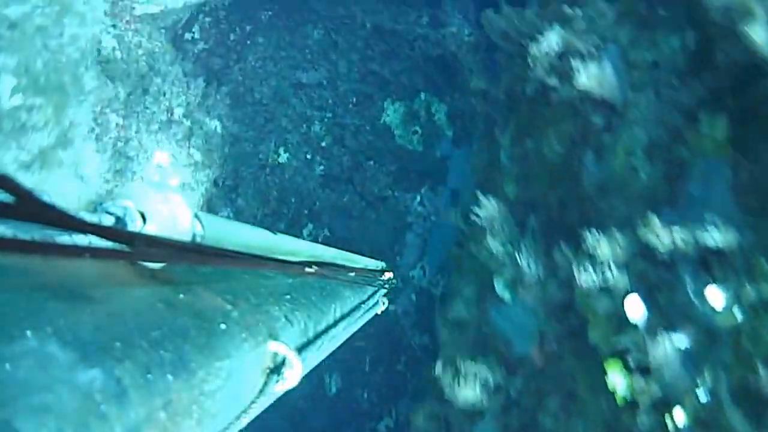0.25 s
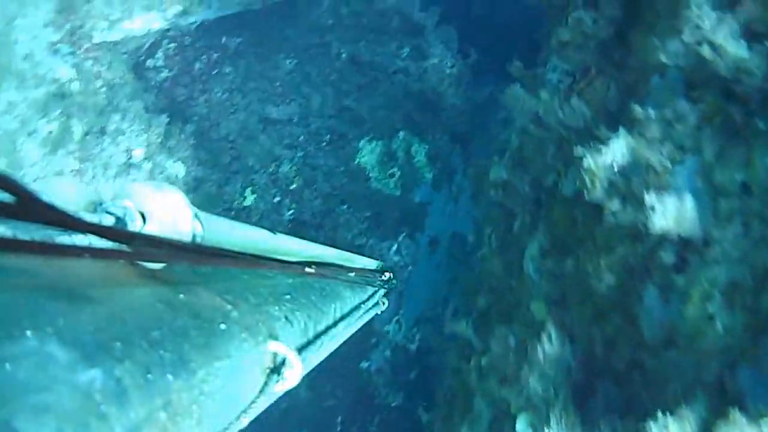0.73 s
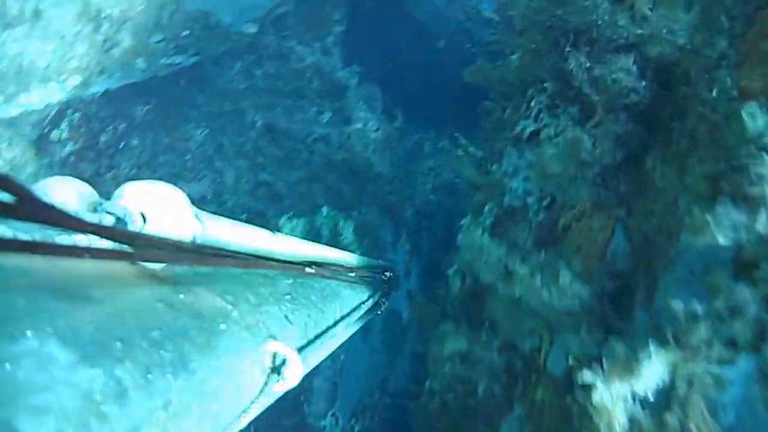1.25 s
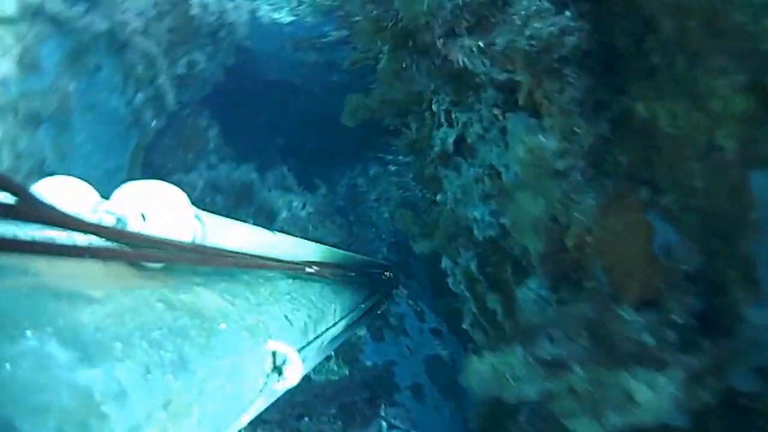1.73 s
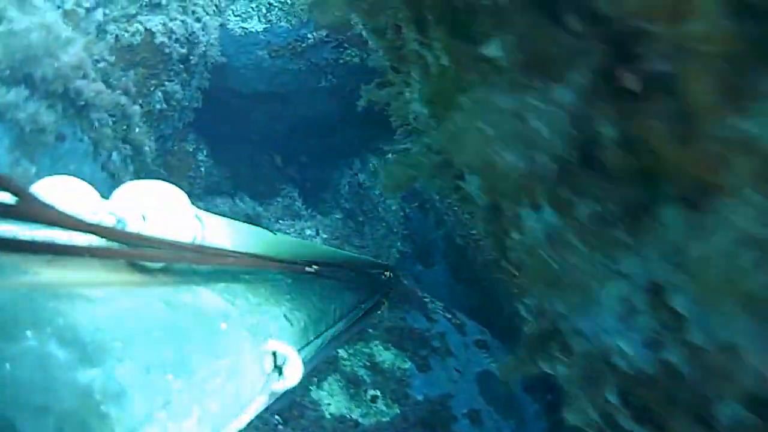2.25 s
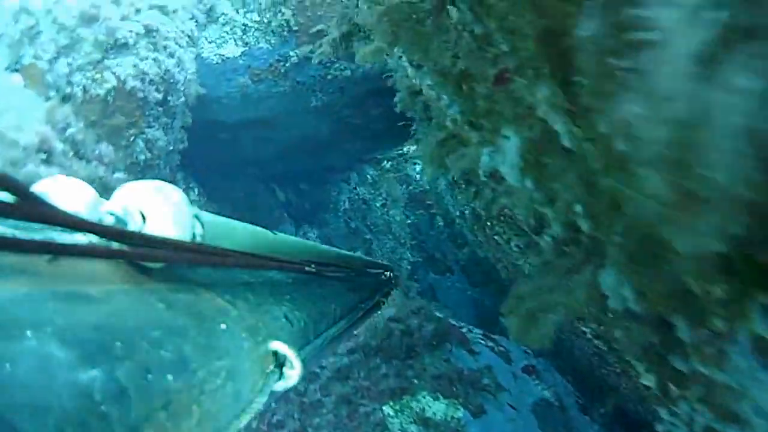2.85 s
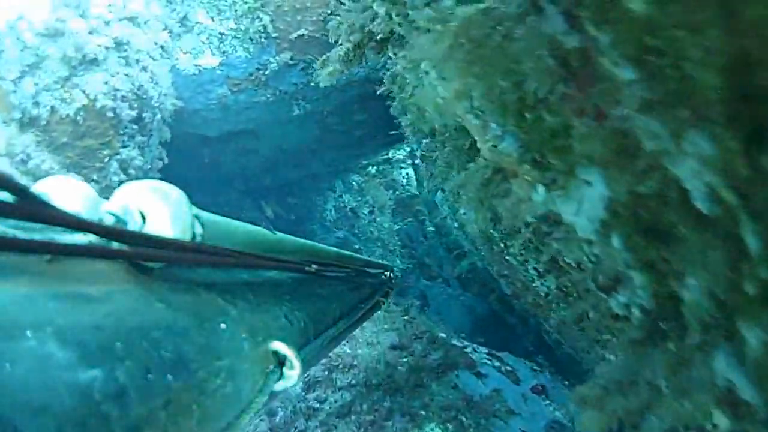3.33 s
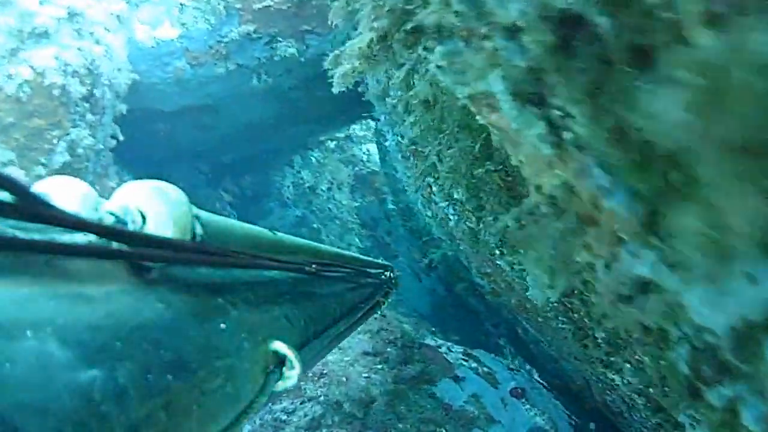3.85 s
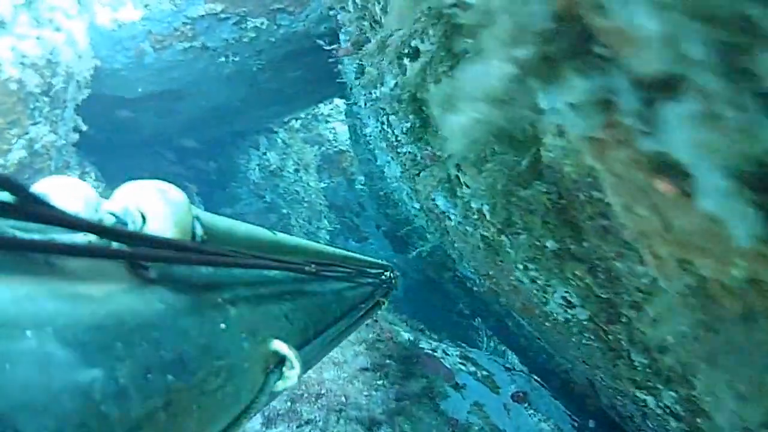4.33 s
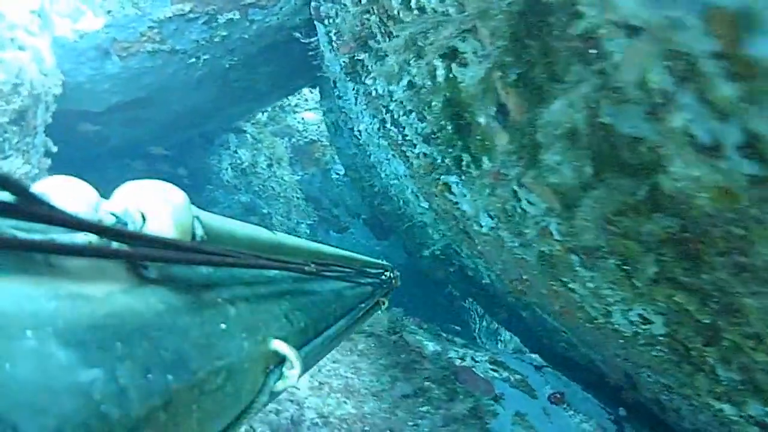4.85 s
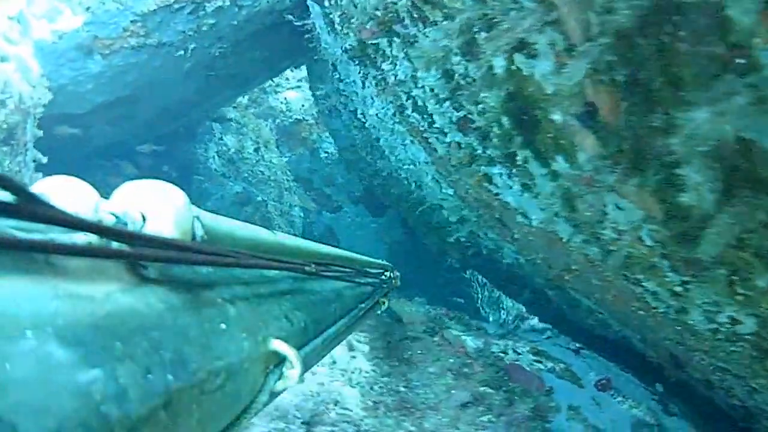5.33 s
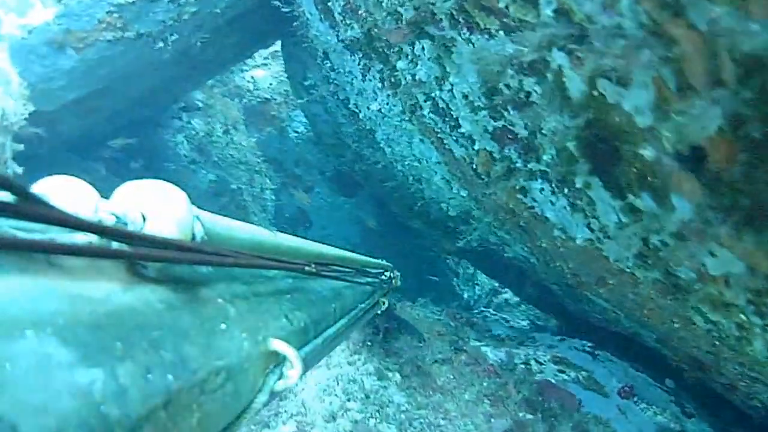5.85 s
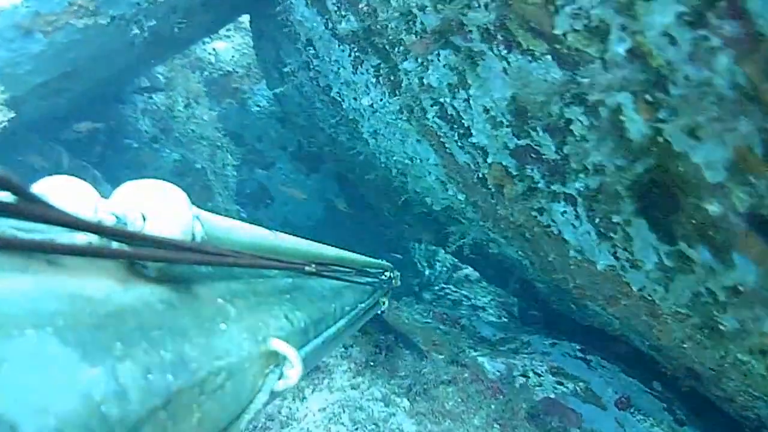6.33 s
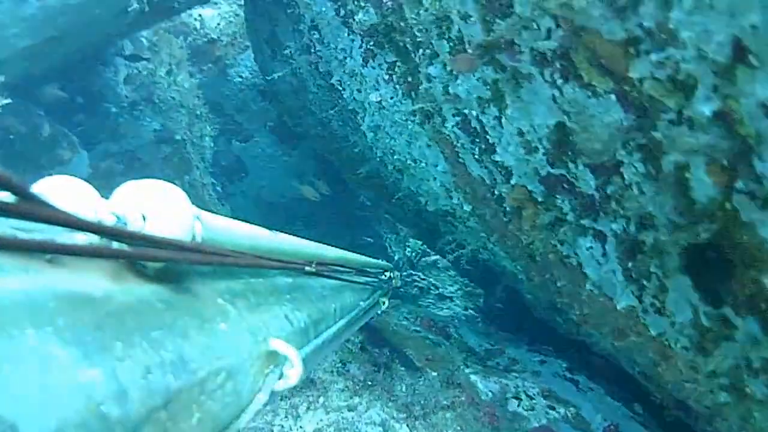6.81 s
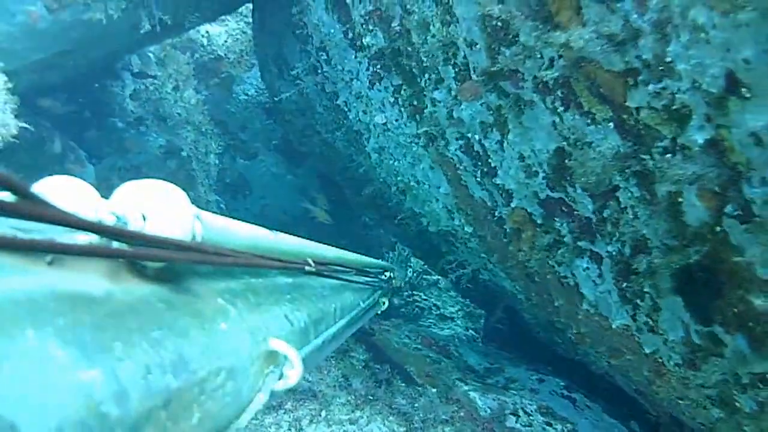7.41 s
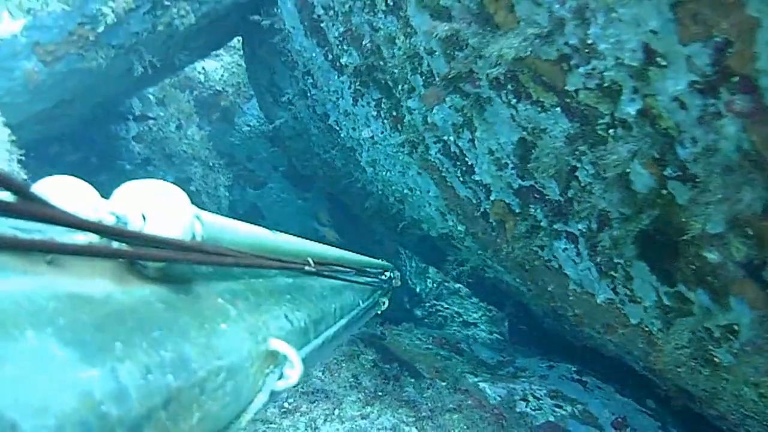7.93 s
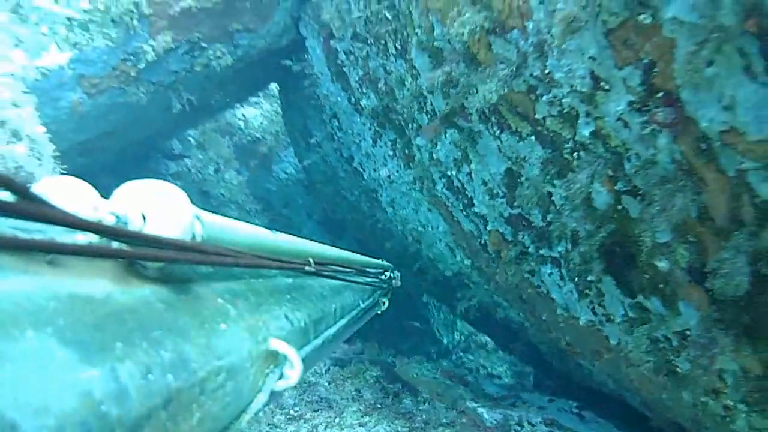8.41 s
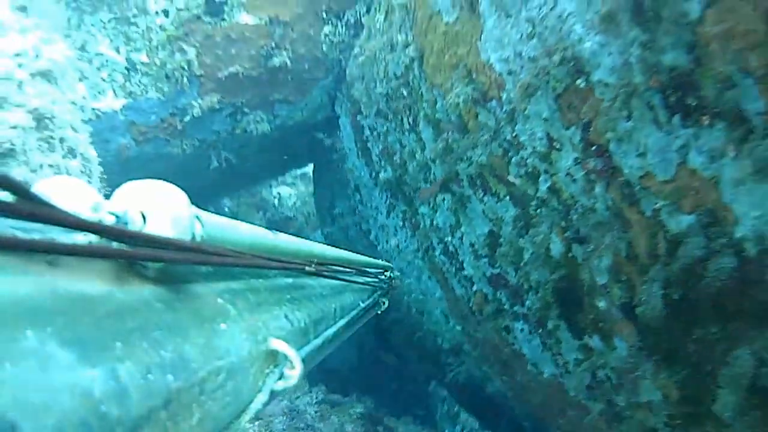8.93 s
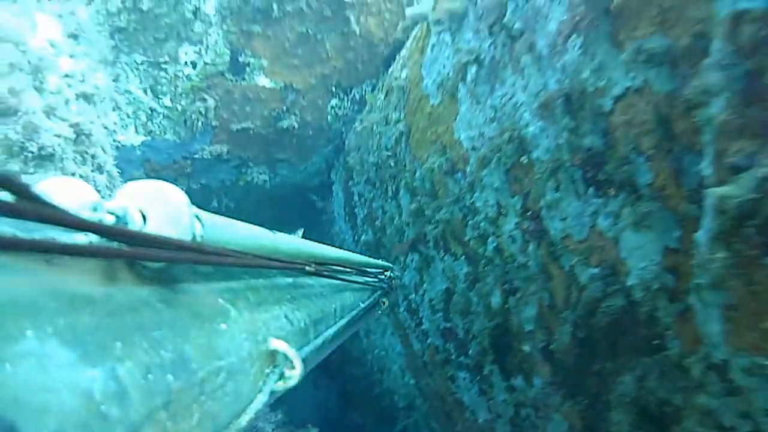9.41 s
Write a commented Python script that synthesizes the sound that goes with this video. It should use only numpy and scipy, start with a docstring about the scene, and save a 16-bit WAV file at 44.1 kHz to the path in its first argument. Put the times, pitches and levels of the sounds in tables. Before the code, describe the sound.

Water rumbles in surges against an underwater camera housing, with hollow knocks, small gurgles and faint snapping shrimp.

```python
"""A rocky reef, heard from a camera housing carried by a swimming diver.
Eddies rock the housing and rumble on it in surges that ease off. Gear knocks and rebounds on
its shell, which rings. Squeezed air pockets gurgle; shrimp snap all around, heard through the wall.
A third of the way in a faint electronic hiss and whine set in, with dry clicks and brief rustles."""
import sys
import numpy as np
from scipy import signal
from scipy.fft import rfft, irfft, next_fast_len
from scipy.io import wavfile
from scipy.ndimage import uniform_filter1d, map_coordinates

SR = 44100
rng = np.random.default_rng(int(sys.argv[2]) if len(sys.argv) > 2 else 0)


def to_wav(s):
    """Save 16-bit WAV."""
    ch = np.atleast_2d(s).T  # columns
    pcm = np.round(np.clip(ch, -1, 1) * 32767)  # PCM
    wavfile.write(sys.argv[1], SR, pcm.astype(np.int16))


N = 426447
TIME = np.arange(N) / SR


def from_db(db):
    """Decibels to gain."""
    return 10 ** (np.asarray(db) / 20)


def rms_one(x):
    """Scale to rms 1."""
    return x / np.sqrt(np.mean(x ** 2) + 1e-20)


def peak_one(x):
    """Scale to peak 1."""
    return x / (np.abs(x).max() + 1e-20)


def gain_curve(rows):
    """Gain through points of (time [s], level [dB])."""
    return from_db(np.interp(TIME, *np.transpose(rows)))


def add(track, start_s, sound):
    """Mix a sound into a track."""
    i = max(0, int(round(start_s * SR)))
    track[i:i + len(sound)] += sound[:max(0, N - i)]


def coloured(x, spectrum):
    """Apply a spectrum, falling 26 dB per octave beyond its ends."""
    hz, db = np.transpose(spectrum)
    size = next_fast_len(len(x))
    octave = np.log2(np.fft.rfftfreq(size, 1 / SR) + 1e-3)
    points = np.log2(hz)
    beyond = np.abs(octave - np.clip(octave, points[0], points[-1]))
    gain = from_db(np.interp(octave, points, db) - 26 * beyond)
    return irfft(rfft(x, size) * gain, size)[:len(x)]


def noise(spectrum):
    """Coloured noise of rms 1."""
    return rms_one(coloured(rng.standard_normal(N), spectrum))


def steady_noise(spectrum, span_s):
    """Coloured noise of rms 1, levelled over a sliding span."""
    x = noise(spectrum)
    envelope = np.abs(signal.hilbert(x, next_fast_len(N))[:N])
    power = uniform_filter1d(envelope ** 2, max(1, int(span_s * SR)))
    return rms_one(x / np.sqrt(power + 1e-6))


def resonance(x, hz, width_hz):
    """Two-pole resonator, peak gain 1."""
    r = np.exp(-np.pi * width_hz / SR)
    feedback = [1, -2 * r * np.cos(2 * np.pi * hz / SR), r * r]
    return signal.lfilter(np.array([1, 0, -1]) * (1 - r * r) / 2, feedback, x + 1e-18)


def ringing(x, modes):
    """Parallel resonators."""
    return sum(from_db(db) * resonance(x, hz, width_hz) for hz, width_hz, db in modes)


def band(x, low_hz, high_hz, order=2):
    """Butterworth band-pass."""
    sos = signal.butter(order, [low_hz, high_hz], "band", fs=SR, output="sos")
    return signal.sosfilt(sos, x + 1e-18)


def grains(per_s, spread_db):
    """Random impulses, a few much stronger than the rest."""
    sizes = from_db(spread_db * np.minimum(rng.exponential(1, N), 4)) * rng.choice([-1, 1], N)
    return sizes * (rng.random(N) < per_s / SR)


# (frequency [Hz], relative density [dB])
HISS_SPECTRUM = [(300, -40), (2000, 1), (4500, 11), (6500, 8.5), (9000, 7.5), (12500, 5.5), (15500, 0)]
# (frequency [Hz], rms [dB])
WHINE_TONES = [(3900, -73), (15000, -77)]
def electronics(hiss_db=-68):
    """Thin electronic hiss and a steady whine."""
    whine = sum(from_db(db) * np.sqrt(2) * np.sin(2 * np.pi * hz * TIME) for hz, db in WHINE_TONES)
    return whine + from_db(hiss_db) * noise(HISS_SPECTRUM)


# (frequency [Hz], gain [dB])
RUB_SPECTRUM = [(500, 3), (2000, -10), (4000, -8), (8300, -9), (9800, -14), (14000, -10), (16000, -22)]
# (frequency [Hz], width [Hz], gain [dB])
RUB_MODES = [(4040, 250, 3), (4930, 220, 4), (6170, 680, -1), (6500, 270, -5), (8450, 350, 0)]
# (crest time [s], rms [dB], rise [s], fall [s])
RUB_SWELLS = [(3.89, -60, 0.031, 0.068), (4.69, -67, 0.022, 0.06), (4.82, -65.5, 0.05, 0.21),
              (7.174, -44.5, 0.001, 0.049), (7.33, -45, 0.019, 0.015), (7.413, -58.5, 0.008, 0.026),
              (7.82, -58, 0.063, 0.033), (8.365, -58, 0.015, 0.015), (8.7, -61, 0.012, 0.012)]
def rustle(ring_db=-2):
    """Dry, grainy rubs swell and die away, exciting sharp resonances."""
    rubbing = coloured(grains(per_s=2800, spread_db=3.2), RUB_SPECTRUM)
    ring = from_db(ring_db) * rms_one(ringing(rubbing, RUB_MODES))
    pressure = sum(from_db(db) * np.exp(-np.maximum((at_s - TIME) / rise_s, (TIME - at_s) / fall_s))
                   for at_s, db, rise_s, fall_s in RUB_SWELLS)
    return pressure * rms_one(rms_one(rubbing) + ring)


# (time [s], peak [dB], tick centre [Hz], edge re tick [dB], body re tick [dB])
DRY_CLICKS = [(3.893, -31.5, 5800, -22, -25), (3.899, -30.5, 7000, 10, -25), (3.943, -37, 9900, 9, -25),
              (4.6585, -25.5, 5130, -28, -5), (4.8394, -38, 6600, 0, -25), (7.171, -23, 6700, -4, -8),
              (7.189, -34, 7000, -20, -20), (7.331, -44, 3000, -25, -16), (7.3368, -24.5, 6200, -15, 2),
              (8.057, -46, 5200, -18, -15)]
def dry_clicks(decay_s=0.0012, width_hz=2400):
    """Crisp noise bursts: a pitched tick, a shorter bright edge, a dull body."""
    out, t = np.zeros(N), TIME[:SR // 40]
    decay = np.exp(-t / decay_s)
    for at_s, db, hz, edge_db, body_db in DRY_CLICKS:
        burst = rng.standard_normal(len(t)) * decay
        tick = peak_one(resonance(resonance(burst, hz, width_hz), hz, width_hz))
        edge = from_db(edge_db) * peak_one(band(burst * decay, 9100, 17400))
        body = from_db(body_db) * peak_one(band(burst, 330, 2300))
        add(out, at_s, from_db(db) * peak_one(tick + edge + body))
    return out


# (time [s], relative level [dB])
SEA_FADE = [(0, -50.5), (5.9, -52.5), (9.67, -56)]
# (frequency [Hz], relative density [dB])
SEA_SPECTRUM = [(150, -10.5), (330, 4), (410, 4.5), (490, 7), (590, 0.5), (800, -0.5), (1400, -4.5),
                (1800, -3), (2200, -6.5), (3200, -10.5), (3650, -8.5), (4100, -34)]
def open_water(gain_db=4.5, diffuse_db=-15):
    """Slowly fading sea noise: its gain curve, a mono murmur and a diffuse stereo part."""
    gain = gain_curve(SEA_FADE) * from_db(gain_db)
    diffuse = from_db(diffuse_db) * rms_one(band(rng.standard_normal((2, N)), 860, 3475, order=8))
    return gain, gain * noise(SEA_SPECTRUM), gain * diffuse


# (frequency [Hz], width [Hz], gain [dB])
WALL_MODES = [(1790, 130, 1.5), (1290, 900, -32.5), (2790, 560, -4.5)]
def housing_wall(snaps, top_mode_db):
    """The wall rings with each snap and blocks the high treble."""
    *lower_modes, (hz, width_hz, db) = WALL_MODES
    modes = lower_modes + [(hz, width_hz, db + top_mode_db)]
    return band(ringing(snaps, modes), 910, 4050, order=6)


# (time [s], relative peak [dB], relative top mode gain [dB])
NEAR_SNAPS = [(0.616, -39, -6), (0.799, -36.5, -7), (1.506, -37, -10), (1.9142, -31.5, -11),
              (0.4787, -37.5, -24), (2.143, -37, -9), (2.3131, -33.5, -41), (2.6896, -37.5, -8),
              (2.989, -38.5, -25), (3.109, -39.5, -19), (4.0412, -37.5, -30), (4.384, -38.5, -9),
              (4.644, -36.5, -24), (5.2462, -33.5, -8.5), (5.549, -39.5, -31), (6.497, -41, 3),
              (7.0477, -38, -20), (7.8646, -37, -13), (7.8768, -33, -10), (8.399, -39, -12),
              (9.2797, -37.5, -11)]
def shrimp(sea_gain, near_db=7.0, far_db=-9.0, smear_s=0.0037):
    """Near snaps, smeared by the rocks, over the crackle of the whole reef."""
    near, t = np.zeros(N), TIME[:SR // 25]
    for at_s, db, top_mode_db in NEAR_SNAPS:
        snap = rng.standard_normal(len(t)) * np.exp(-t / smear_s)
        add(near, at_s - .001, from_db(db + near_db) * peak_one(housing_wall(snap, top_mode_db + 6.0)))
    far_snaps = grains(per_s=200, spread_db=3.6)
    smeared = signal.lfilter([1], [1, -np.exp(-1 / (smear_s * SR))], far_snaps + 1e-18)
    crackle = rms_one(housing_wall(smeared * rng.standard_normal(N), top_mode_db=-2.6))
    return near + sea_gain * from_db(far_db) * crackle


# (time [s], rms [dB])
BURBLE_LEVEL = [(0, -48), (3.5, -53.5), (8.3, -53), (9.0, -67)]
def burble():
    """Small air pockets ring at random."""
    pockets = resonance(grains(per_s=110, spread_db=1.6), hz=475, width_hz=45)
    return gain_curve(BURBLE_LEVEL) * rms_one(band(pockets, 250, 650))


# (time [s], peak [dB], pitch [Hz], squeeze length [s])
AIR_POCKETS = [(0.233, -26, 484, 0.014), (0.498, -20.5, 488, 0.061), (0.942, -27, 484, 0.012),
               (2.104, -26.5, 489, 0.013), (2.357, -21, 481, 0.015), (3.267, -26, 488, 0.041),
               (3.351, -31.5, 496, 0.04), (3.871, -33, 470, 0.023), (3.961, -28, 412, 0.029),
               (4.421, -36, 492, 0.014), (5.277, -29.5, 383, 0.014), (5.547, -31, 483, 0.0047),
               (5.635, -32.5, 465, 0.025), (5.7, -37, 488, 0.015), (5.965, -35.5, 486, 0.032),
               (6.347, -27, 364, 0.019), (6.355, -30.5, 522, 0.029), (6.411, -25.5, 471, 0.037),
               (6.779, -26, 472, 0.01), (7.368, -26, 492, 0.013), (7.564, -32.5, 499, 0.038),
               (7.685, -33.5, 450, 0.02), (7.983, -32, 460, 0.0058), (8.262, -27, 502, 0.023),
               (8.345, -30, 507, 0.03), (9.278, -36, 456, 0.011)]
def gurgles(decay_s=0.013, flutter_share=0.4, rise_share=0.09):
    """Larger air pockets pulsate while squeezed, rising slightly in pitch."""
    out, t = np.zeros(N), TIME[:SR // 8]
    for at_s, db, hz, length_s in AIR_POCKETS:
        envelope = (1 - np.exp(-t / 0.00018)) * np.exp(-np.maximum(t - 0.55 * length_s, 0) / decay_s)
        pitch_hz = hz * (1 + rise_share * (np.minimum(t / length_s, 1) - .5))
        tone = np.sin(2 * np.pi * np.cumsum(pitch_hz) / SR)
        flutter = flutter_share * rms_one(band(rng.standard_normal(len(t)), 390, 535))
        add(out, at_s, from_db(db) * peak_one(envelope * (tone + flutter)))
    return out


# water speed past the housing (time [s], relative level [dB])
FLOW_SPEED = [(0, -20), (0.27, -23), (0.37, -13.5), (0.7, -19), (1.08, -13), (1.8, -17.5), (2.85, -19),
              (3.5, -21.5), (3.7, -30), (3.94, -17), (4.1, -23.5), (5.6, -26.5), (6.0, -24.5), (6.8, -29.5),
              (7.35, -26), (7.7, -30.5), (9.3, -32), (9.67, -24)]
# (time [s], sway boost [dB], swish rms [dB])
DIVER_SURGES = [(0.57, 7, -33.5), (1.58, 10, -39.5), (2.15, 10.5, -40.5), (2.7, 8, -49.5), (3.6, 6, -55.5),
                (4.25, 8, -63), (6.35, 6, -54.5), (7.25, 3.5, -48.5)]
# each (frequency [Hz], relative density [dB])
SWAY_SPECTRUM = [(6, -13), (10, 1), (14, -2), (20, -12.5), (32, -26.5), (42, -29)]
BOOM_SPECTRUM = [(26, -19.5), (35, -12), (43, 3.5), (48, -1.5), (56, 5.5), (62, -8), (72, -15.5),
                 (110, -37.5)]
WASH_SPECTRUM = [(50, -10.5), (75, -3.5), (100, 0), (135, -5.5), (185, -9), (240, -9), (330, -18),
                 (480, -26), (900, -40)]
SWISH_SPECTRUM = [(150, -6), (240, 3.5), (310, -4), (430, -22)]
def flow(usual_speed_db=-23, sway_db=-20.5, boom_db=-24.75, wash_db=-42.5, surge_sigma_s=0.15):
    """Eddies sway, boom and wash on the housing, growing with speed; surges add sway and swish."""
    speed = gain_curve(FLOW_SPEED) / from_db(usual_speed_db)
    at_s, boost_db, swish_db = np.transpose(DIVER_SURGES)
    surges = np.exp(-.5 * ((TIME - at_s[:, None]) / surge_sigma_s) ** 2)
    sway_gain = from_db(sway_db + boost_db @ surges) * speed ** 0.52
    sway = sway_gain * steady_noise(SWAY_SPECTRUM, span_s=0.17)
    boom = from_db(boom_db) * speed * steady_noise(BOOM_SPECTRUM, span_s=0.2)
    wash = from_db(wash_db) * speed ** 0.63 * steady_noise(WASH_SPECTRUM, span_s=0.03)
    swish = from_db(swish_db) @ surges * noise(SWISH_SPECTRUM)
    return sway + boom + wash + swish


# (frequency [Hz], relative level [dB], t60 [s])
HOUSING_MODES = [(128.7, -19, 0.26), (160, -14.5, 0.16), (218, -18.5, 0.28), (246.5, -8.5, 0.17),
                 (333.7, -10, 0.12), (433.4, -12.5, 0.1), (487, -13.5, 0.1), (635, -37, 0.046),
                 (773, -33, 0.044), (836, -38, 0.069)]
# (frequency [Hz], width [Hz], gain [dB])
CRACK_MODES = [(667, 71, -4), (807, 130, -3.5), (840, 230, -3.5), (1242, 38, -3.5), (1477, 51, -2)]
# successive touches of one knock (strength [ratio])
TOUCHES = [0.75, 0.62, 0.39, 0.062]
# (time [s], body peak [dB], rebound gap [s], contact sigma [s], ring gain [dB], crack re body [dB])
GEAR_KNOCKS = [(0.3418, -4, 0.0061, 0.00069, -4, -28), (1.083, -12, 0.008, .001, -9, -23),
               (1.091, -20.5, 0.0037, 0.00053, -31, -3.5), (1.2, -3.5, 0.0082, .0012, -15, -17),
               (1.2041, -8, 0.00385, 0.00072, -14.5, -15), (1.705, -20, 0.0038, 0.00067, -21, -29),
               (1.94, -16, 0.0059, 0.00065, -10, -32.5), (1.967, -12.5, 0.0066, 0.00096, -4.5, -22),
               (2.126, -12, 0.0036, 0.0008, -8, -21), (2.4676, 7, 0.0043, 0.00045, 2.5, -16.5),
               (3.961, -30, 0.0064, 0.0013, 7, -13), (4.076, -28, 0.0045, 0.00043, -5, -24),
               (5.394, -28, 0.0059, 0.0004, -19, -19), (7.332, -27.5, 0.0103, 0.0016, -5, -18),
               (7.818, -31.5, 0.0071, 0.00084, -5, -25), (8.986, -48, 0.0025, 0.00019, -14, 13),
               (9.481, -20, 0.0069, 0.001, -11, -27)]
def knocks(crack_s=0.0015, ring_attack_s=0.00087, yield_share=0.46):
    """Gear hits and rebounds; the housing yields to the slow part of each push and rings on."""
    out, t = np.zeros(N), TIME[:SR // 3] - .003
    age_s = np.maximum(t, 0)
    ring = sum(from_db(db - 60 * age_s / t60_s) * np.sin(2 * np.pi * hz * age_s)
               for hz, db, t60_s in HOUSING_MODES)
    ring *= 1 - np.exp(-age_s / ring_attack_s)
    for at_s, db, gap_s, contact_s, ring_db, crack_db in GEAR_KNOCKS:
        pushes = sum(strength * np.exp(-.5 * ((t - k * gap_s) / contact_s) ** 2)
                     for k, strength in enumerate(TOUCHES))
        thud = peak_one(band(pushes, yield_share / gap_s, 3000))
        body = peak_one(thud + from_db(ring_db) * ring)
        grit = rng.standard_normal(len(t)) * np.exp(-age_s / crack_s) * (t > 0)
        crack = peak_one(band(ringing(grit, CRACK_MODES), 610, 2200, order=4))
        add(out, at_s, from_db(db) * (body + from_db(crack_db) * crack))
    return out


def scene(right_lead_s=0.00013, hiss_start_s=3.385, floor_db=-83):
    """Water sounds reach the right port first; clicks, rustle and electronics sit in the middle."""
    sea_gain, murmur, diffuse = open_water()
    right = murmur + shrimp(sea_gain) + burble() + gurgles() + flow() + knocks()
    left = map_coordinates(right, [np.arange(N) - right_lead_s * SR], order=3, mode="nearest")
    middle = (electronics() + rustle()) * (TIME > hiss_start_s) + dry_clicks()
    self_noise = from_db(floor_db) * rng.standard_normal((2, N))
    return np.array([left, right]) + diffuse + middle + self_noise


# left and right input (DC bias [share of full scale])
INPUT_BIAS = [
    [0.06],
    [0.053],
]
def record(dry, fade_s=0.006, ceiling=0.89, cutoff_hz=15900):
    """Input bias, quick end fades, soft clipping of the hardest knocks, steep low-pass."""
    fade = np.minimum(np.minimum(TIME, TIME[::-1]) / fade_s, 1)
    biased = (dry + INPUT_BIAS) * fade
    clipped = biased / (1 + (biased / ceiling) ** 10) ** (1 / 10)
    return signal.sosfilt(signal.ellip(10, .1, 80, cutoff_hz, fs=SR, output="sos"), clipped)


dry = scene()
out = record(dry)
to_wav(out)
```